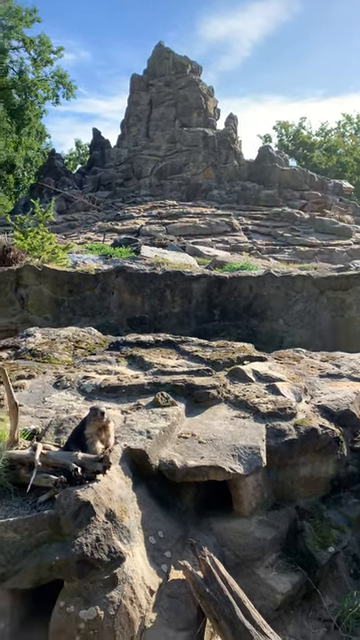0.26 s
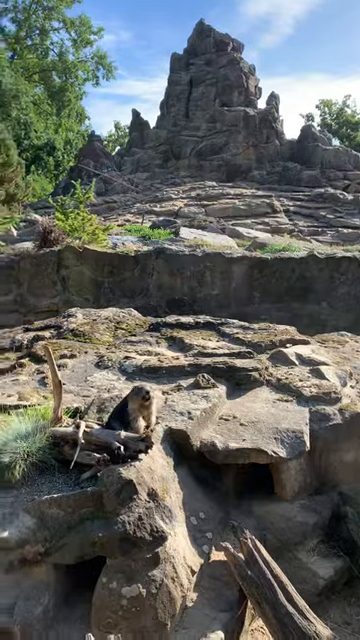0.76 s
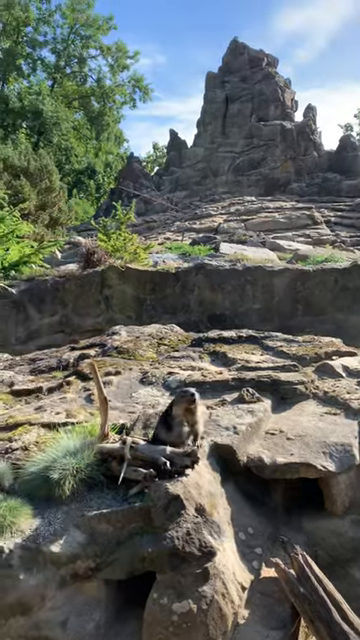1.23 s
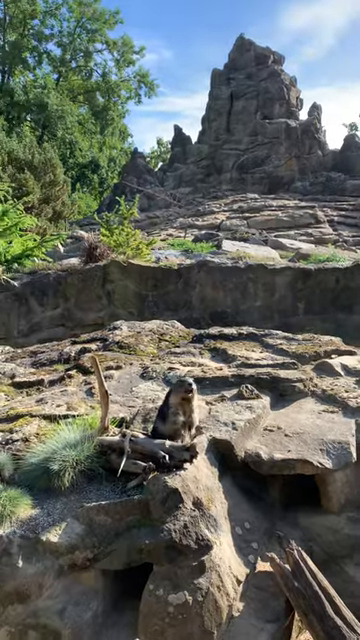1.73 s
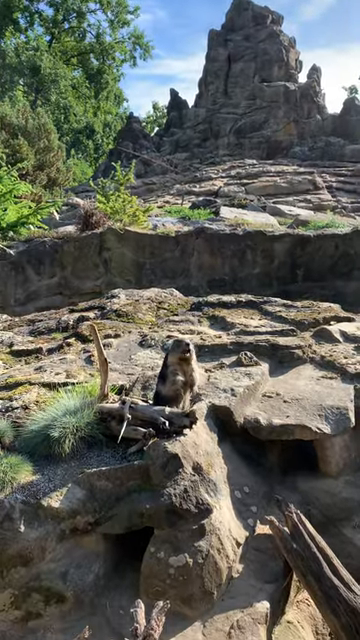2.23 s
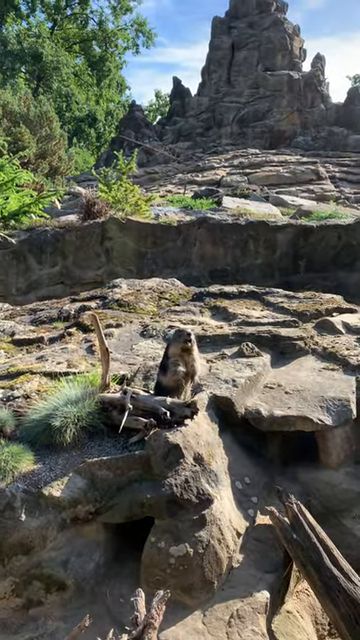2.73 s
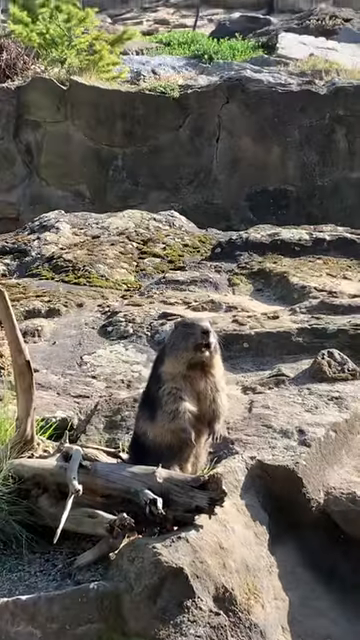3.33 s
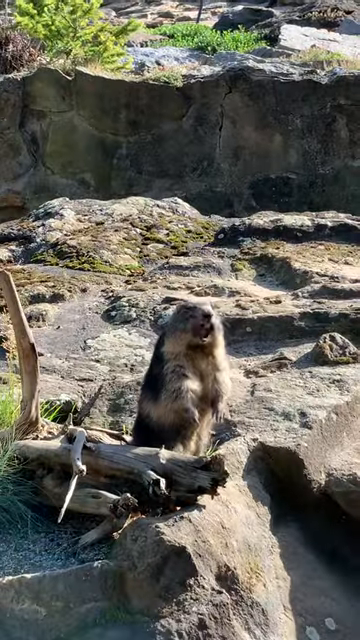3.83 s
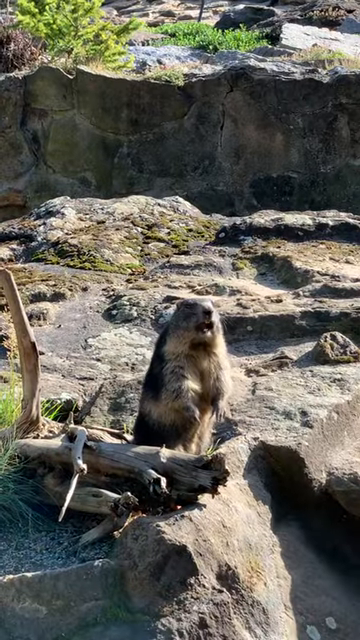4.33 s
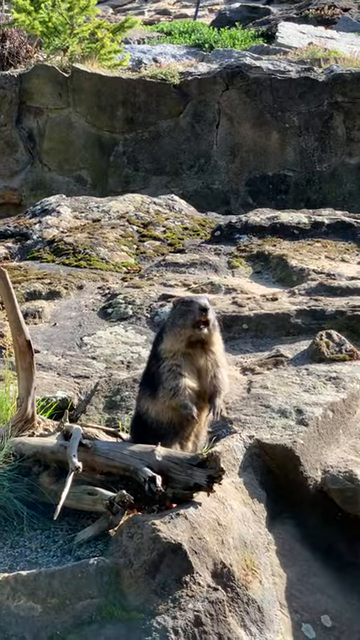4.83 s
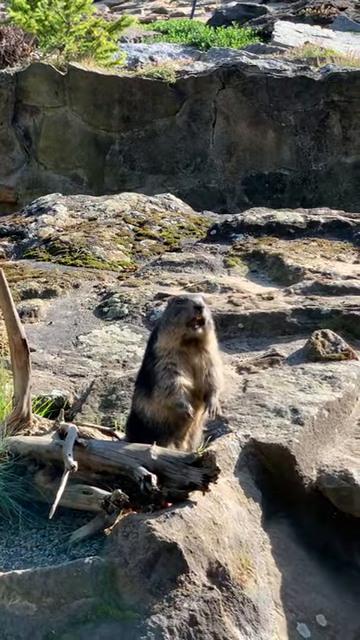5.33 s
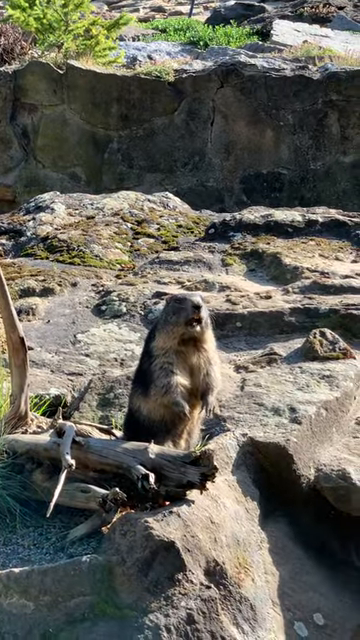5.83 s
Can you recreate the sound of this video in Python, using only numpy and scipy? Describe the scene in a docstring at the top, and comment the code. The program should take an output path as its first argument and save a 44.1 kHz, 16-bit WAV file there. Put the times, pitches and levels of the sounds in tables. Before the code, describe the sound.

Eight piercing, raspy-edged marmot whistles ring out one by one in a rocky enclosure, with tiny far-off birds and low background noise.

```python
"""A low outdoor rumble and a thin wide hiss, both filtered noise, run throughout.
Small far birds add gliding sine chirps from the start, and a few soft low calls later.
A marmot on a rock gives eight shrill whistles: harmonics and rasp sweep up, clear at the top, fall away.
Rock faces throw each whistle back as single bounces and dense scattered echoes.
Loud whistles then drive the recorder's gain down, and much of the cut creeps back slowly."""
import sys
import numpy as np
from scipy import signal
from scipy.fft import rfft, irfft, next_fast_len
from scipy.io import wavfile
from scipy.ndimage import uniform_filter1d

SR = 44100
rng = np.random.default_rng(int(sys.argv[2]) if len(sys.argv) > 2 else 0)


def unload_audio(sound):
    """Save the sound as a 16-bit wav file, at the path given as the first command line argument."""
    columns = np.transpose(np.atleast_2d(sound))
    # keep every value between -1 and 1, then stretch to whole-number steps
    steps = np.round(np.clip(columns, -1, 1) * 32767)
    wavfile.write(sys.argv[1], SR, steps.astype(np.int16))


N = 267246
TIME = np.arange(N) / SR

# Low rumble spectrum, relative: freq_hz, density_db_per_hz
RUMBLE_SPECTRUM = [(15, -50.5), (27, -18), (38, 3), (52, -1.5), (70, 3), (110, -0.5), (160, -11),
                   (300, -22), (800, -59.5)]
# Low rumble level ahead of the recorder: time_s, level_db
RUMBLE_LEVEL = [(0, -38.5), (.7, -40), (1.2, -37), (1.6, -41.5), (3.6, -41), (4.2, -38), (6.06, -38)]
# Outdoor hiss spectrum, relative: freq_hz, density_db_per_hz
AIR_SPECTRUM = [(40, -19), (100, -8), (200, -10.5), (350, -13.5), (650, -18.5), (1250, -20.5),
                (1900, -18.5), (2400, -27.5), (3900, -29.5), (5000, -36.5), (8300, -33.5), (9700, -51.5),
                (10800, -41), (12800, -41), (14500, -65)]
AIR_DB = -48

# Two-note chirps of a small far bird, before the birds' common trim: start_s, first_pitch_hz, level_db
CHIRPS = [(.08, 4360, -47), (0.448, 4400, -47), (2.09, 4380, -52), (2.69, 4100, -51.5),
          (3.174, 4430, -46.5), (3.609, 4020, -45.5), (5.684, 4910, -46.5), (6.019, 4270, -47)]
# Soft low calls from further off, before the same trim: start_s, length_s, start_pitch_hz, level_db
LOW_CALLS = [(3.091, 0.128, 1155, -46), (3.251, .043, 1160, -47), (3.94, 0.124, 730, -50),
             (5.007, 0.07, 950, -55)]
# Falls are end pitch / start pitch; the second note starts lower by SECOND_NOTE_PITCH
NOTE_S, NOTE_GAP_S, NOTE_FALL, SECOND_NOTE_PITCH = 0.076, .06, .87, .84
LOW_CALL_FALL = .92

# Whistles, ahead of the recorder:
# top_s, dwell_s, top_pitch_hz, rise_stretch, fall_stretch, level_db, overtones_db, rasp_db
WHISTLES = [(0.806, .02, 2236, 1.2, 1.42, 16.5, -2, -3), (1.229, 0.0019, 2174, 1.05, 1.1, 12.5, -3.5, -0.5),
            (1.783, 0, 2106, 1.12, 1.24, 9.5, -3.5, -0.5),
            (2.294, 0.00019, 2094, 1.03, 1.14, 7.5, -5, -0.5), (2.912, 0, 2089, 1.03, 1.12, 8, -4.5, 0.5),
            (3.830, 0.0015, 2060, 1.01, 1.2, 9, -2.5, 0.5), (4.562, 0, 2068, 1.014, 1.04, 9, -3, 1),
            (5.239, 0.00016, 2054, 1.033, 1.03, 8.5, -3.5, 2.5)]
# Whistle harmonics, relative: multiple, level_db
HARMONICS = [(1, -7.5), (2, -10), (3, -21.5), (4, -25), (5, -30.5), (6, -43.5), (7, -34.5)]
# Mouth resonances: freq_hz, gain_db
MOUTH_RESONANCE = [(650, -12), (950, -5), (1400, -2), (1750, -1.5), (2000, 0), (2130, 4.5), (2260, -7.5),
                   (2700, 1.5), (3400, 5.5), (3900, -4), (4250, 0.5), (5000, -5), (6000, -3), (6900, -12),
                   (8200, -8.5)]
# Air rushing through the throat, relative: freq_hz, density_db_per_hz
RASP_SPECTRUM = [(120, -23.5), (240, -3), (420, -22.5), (700, -18), (1050, -2), (1500, -0.5), (2200, -4.5),
                 (2700, 5), (4200, 0), (5200, -5), (5900, -10), (8200, -18), (11000, -23), (16000, -31.5)]
# Throat tightening and slackening times, before each whistle's stretch
TIGHTEN_S, TIGHTEN_SHAPE, SLACKEN_S = .036, 2.7, .056
# Slack throat before and after the top: share of top pitch, roughness 0-1
START_SHARE, END_SHARE = .28, .44
START_ROUGH, END_ROUGH = .95, .2
# Push of air, on the time axis before each whistle's stretch
LEAD_S, OPEN_S, HOLD_BEFORE_S, HOLD_AFTER_S, TRAIL_S = 0.048, .008, .0135, 0.021, .057
SWELL_DB_PER_S, SAG_DB_PER_S, RELEASE_DB_PER_S = 879, 98, 848.5   # release adds to the sag
ROUGH_LOSS_DB = 4   # loss of harmonics 3 and up at roughness 1

# Near rock faces, relative to direct sound: delay_s, level_db
ROCK_BOUNCES = [(.0047, -15), (.0125, -17), (.0215, -23)]
WALL_DELAY_S, WALL_DB = .21, -45.5   # far wall, relative to direct sound
# Interchannel phase of the direct sound and bounces: freq_hz, left_lead_rad
PORT_PHASE = [(0, -0.5), (700, -1.5), (1400, 1.5), (1850, -1.8), (2200, 2.13), (2400, -1), (3050, -1.5),
              (3800, -5.5), (4200, -5.5), (4500, -2), (5400, -2.5), (8400, 1.75), (16000, 10.5)]
# Scatter off rough stone, strongest for short waves: freq_hz, gain_db
STONE_SCATTER = [(300, -22), (1200, -18), (2000, -17.5), (3000, -14), (4200, -17), (6000, -11), (8500, -10),
                 (16000, -6)]
# Far echo colour, before the far level: freq_hz, gain_db
FAR_COLOUR = [(300, 0), (1500, 2.5), (2100, -1.5), (2600, 3), (3400, 3.5), (4150, 2), (5000, 0.5),
              (6200, -0.5), (9000, -13), (16000, -33)]

# Microphone port response: freq_hz, gain_db
PORT_RESPONSE = [(20, -5), (8600, 2), (9300, -6.5), (9800, -11), (10400, -1.5), (11000, 2), (16000, 0.5)]
CUTOFF_HZ = 15900


def from_db(db):
    """Decibels to amplitude gain."""
    return 10 ** (np.asarray(db) / 20)


def rms_one(x):
    """Scale to rms 1."""
    return x / np.sqrt(np.mean(x ** 2) + 1e-20)


def gain_at(points, hz):
    """Gain of a (freq_hz, db) curve, interpolated over log frequency."""
    f, db = np.transpose(points)
    return from_db(np.interp(np.log(np.maximum(hz, 1)), np.log(f), db))


def colour(x, points):
    """Zero-phase filter by a (freq_hz, db) curve."""
    size = next_fast_len(x.shape[-1] + 4096)
    gain = gain_at(points, np.fft.rfftfreq(size, 1 / SR))
    return irfft(rfft(x, size) * gain, size)[..., :x.shape[-1]]


def flutter(hz, size):
    """Random motion: noise low-passed at hz, rms 1."""
    noise = rng.standard_normal(max(size, SR // 4))
    lowpass = signal.butter(2, hz, fs=SR, output="sos")
    return rms_one(signal.sosfilt(lowpass, noise)[:size])


def stereo_noise(points, alike):
    """Coloured noise of rms 1; alike is the left-right correlation."""
    mid, side = colour(rng.standard_normal((2, N)), points)
    alike = np.clip(alike, -1, 1)
    return rms_one(np.sqrt(1 + alike) * mid + np.sqrt(1 - alike) * side * [[1], [-1]])


def outdoors(lump_db=1.0, lump_hz=9):
    """Lumpy low rumble, identical in both channels, under a thin wide hiss."""
    level_db = np.interp(TIME, *np.transpose(RUMBLE_LEVEL)) + lump_db * flutter(lump_hz, N)
    rumble = from_db(level_db) * stereo_noise(RUMBLE_SPECTRUM, alike=1.0)
    hiss = from_db(AIR_DB) * stereo_noise(AIR_SPECTRUM, alike=0.35)
    return rumble + hiss


def far_note(start_s, length_s, start_hz, fall, level_db, break_hz=60):
    """A short far sine glide; the trees blur and break up high notes, low ones stay smooth."""
    blur, blur_hz, full_blur_hz = .07, 140, 4500   # blur: pitch share; full scatter from full_blur_hz up
    out = np.zeros((2, N))
    at = np.flatnonzero((TIME > start_s) & (TIME < start_s + length_s))
    scattered = min(start_hz / full_blur_hz, 1) ** 2
    for channel in out:
        glide_hz = start_hz * np.linspace(1, fall, len(at))
        pitch_hz = glide_hz * (1 + blur * scattered * flutter(blur_hz, len(at)))
        breakup = 1 - scattered + scattered * flutter(break_hz, len(at))
        swell = np.hanning(len(at)) ** .5 * breakup
        channel[at] = from_db(level_db) * swell * np.sin(2 * np.pi * np.cumsum(pitch_hz) / SR)
    return out


def birds():
    """Two-note chirps, each note gliding down and the second lower, and a few soft low calls."""
    notes = []
    for start_s, pitch_hz, level_db in CHIRPS:
        for k in (0, 1):
            note_hz = pitch_hz * SECOND_NOTE_PITCH ** k
            notes.append((start_s + k * NOTE_GAP_S, NOTE_S, note_hz, NOTE_FALL, level_db))
    for start_s, length_s, pitch_hz, level_db in LOW_CALLS:
        notes.append((start_s, length_s, pitch_hz, LOW_CALL_FALL, level_db))
    # skip notes that would start past the end
    return sum(far_note(*note) for note in notes if note[0] < TIME[-2])


def throat(t):
    """Pitch share and roughness at t seconds from the top: the slacker the throat, the lower and rougher."""
    rising = t < 0
    # lopsided bell
    tightening = np.abs(t / TIGHTEN_S) ** TIGHTEN_SHAPE
    slackening = (t / SLACKEN_S) ** 2
    slack = 1 - np.exp(-np.where(rising, tightening, slackening))
    share = 1 - slack * (1 - np.where(rising, START_SHARE, END_SHARE))
    rough = slack * np.where(rising, START_ROUGH, END_ROUGH)
    return share, rough


def effort(t):
    """Level in dB of the push of air at t seconds from the top: opening, swell, sagging hold, release."""
    held_s = t + HOLD_BEFORE_S
    opening_db = 20 * np.log10(np.clip((t + LEAD_S) / OPEN_S, 1e-3, 1))
    hold_db = np.minimum(SWELL_DB_PER_S * held_s, -SAG_DB_PER_S * held_s)
    release_db = RELEASE_DB_PER_S * np.maximum(t - HOLD_AFTER_S, 0)
    return opening_db + hold_db - release_db


def marmot(rasp_db=-9, flutter_hz=380, sputter_hz=200):
    """Each whistle starts as a ragged, airy squeak and locks into a clear tone as the pitch peaks."""
    jitter, shimmer, sputter_db = .055, .75, 6   # all scaled by roughness
    waver, waver_hz, flicker_db, dulling_db_per_db = .006, 130, 1.7, .09
    out = np.zeros(N)
    air = rms_one(colour(rng.standard_normal(N), RASP_SPECTRUM))
    for top_s, dwell_s, top_hz, rise, fall, level_db, overtones_db, own_rasp_db in WHISTLES:
        begin_s, end_s = top_s - rise * LEAD_S, top_s + dwell_s + fall * TRAIL_S
        at = np.flatnonzero((TIME > begin_s) & (TIME < end_s))
        size = len(at)
        since_s = TIME[at] - top_s
        # stretched time, paused during the dwell
        progress_s = np.minimum(since_s, 0) / rise + np.maximum(since_s - dwell_s, 0) / fall
        effort_db = effort(progress_s)
        share, rough = throat(progress_s)
        pitch_hz = top_hz * share
        unsteady = waver * flutter(waver_hz, size) + jitter * rough * flutter(flutter_hz, size)
        phase = 2 * np.pi * np.cumsum(pitch_hz * (1 + unsteady)) / SR
        voice = from_db(rasp_db + own_rasp_db) * rough * air[at]
        for k, harmonic_db in HARMONICS:
            # overtones flicker, and fade first as the pressure runs out
            flicker = flicker_db * flutter(waver_hz, size)
            dulling = dulling_db_per_db * effort_db * (since_s > 0)
            bright_db = min(k - 1, 3) * (flicker + dulling)
            bright_db = bright_db - ROUGH_LOSS_DB * rough * (k > 2)
            # unsettled folds shake each harmonic apart
            torn = 1 + shimmer * rough * flutter(flutter_hz, size)
            gain = from_db(harmonic_db + overtones_db * (k > 1) + bright_db)
            voice = voice + gain * gain_at(MOUTH_RESONANCE, k * pitch_hz) * torn * np.sin(k * phase)
        # the flow starts in fits
        fits_db = sputter_db * rough * np.tanh(flutter(sputter_hz, size))
        out[at] += from_db(level_db + effort_db + fits_db) * voice
    return out


def scatter(t60_s, rise_s, points, size):
    """Spectrum of a dense stereo cloud of echoes: noise that builds up, then decays 60 dB per t60_s."""
    t = TIME[:2 * SR]
    envelope = from_db(-60 * t / t60_s) * np.minimum(t / rise_s, 1)
    cloud = envelope * rng.standard_normal((2, len(t)))
    hz = np.fft.rfftfreq(size, 1 / SR)
    return rfft(rms_one(cloud) / np.sqrt(len(t)), size) * gain_at(points, hz)


def enclosure(x, stone_t60_s=0.17, stone_rise_s=0.0091, far_db=-34, far_t60_s=1.0, far_rise_s=.08):
    """Direct sound, single bounces off near rocks and a wall, rough-stone scatter, long far-wall tail."""
    size = next_fast_len(N + 2 * SR)
    hz = np.fft.rfftfreq(size, 1 / SR)
    paths = 1
    for delay_s, level_db in ROCK_BOUNCES + [(WALL_DELAY_S, WALL_DB)]:
        paths = paths + from_db(level_db) * np.exp(-2j * np.pi * hz * delay_s)
    # half the phase lead to the left, half the lag to the right
    left_lead_rad = np.interp(hz, *np.transpose(PORT_PHASE))
    ports = np.exp(1j * left_lead_rad * np.array([[.5], [-.5]]))
    stone = scatter(stone_t60_s, stone_rise_s, STONE_SCATTER, size)
    far = from_db(far_db) * scatter(far_t60_s, far_rise_s, FAR_COLOUR, size)
    return irfft(rfft(x, size) * (paths * ports + stone + far), size)[:, :N]


def scene(birds_db=-2):
    """Outdoor noise, far birds, and the marmot among its rocks."""
    return outdoors() + from_db(birds_db) * birds() + enclosure(marmot())


def gain_control(x, threshold_db=-15.0, attack_s=0.013, release_db_per_s=60,
                 let_go_db=2.5, creep_db_per_s=1.37):
    """Loud sound cuts the gain; a lone burst is let go fast, but once overloads add up most is held."""
    step, patience_s = 44, .16   # step in samples; patience is total overload time
    dt_s = step / SR
    power = uniform_filter1d(np.mean(x ** 2, axis=0), size=220)[::step]
    excess_db = 10 * np.log10(np.maximum(power, 1e-12)) - threshold_db
    peak_db, cut_db, held_db, loud_s = 0, 0, 0, 0
    cuts_db = []
    for over_db in excess_db.tolist():
        loud_s += dt_s * (over_db > 0)
        peak_db = max(over_db, peak_db - release_db_per_s * dt_s, held_db)
        cut_db += (peak_db - cut_db) * dt_s / attack_s
        # the held part creeps away
        new_hold_db = (cut_db - let_go_db) * (loud_s > patience_s)
        held_db = max(held_db - creep_db_per_s * dt_s, new_hold_db, 0)
        cuts_db.append(cut_db)
    return x * from_db(-np.interp(TIME, TIME[::step], cuts_db))


def record(dry):
    """Gain control, rounded peaks, port notch and steep top cut."""
    rounded = 1.29 * np.tanh(gain_control(dry) / 1.422)
    ported = colour(rounded, PORT_RESPONSE)
    top_cut = signal.cheby2(16, 70, CUTOFF_HZ + 700, fs=SR, output="sos")   # 70 dB down at the stopband edge
    return signal.sosfilt(top_cut, ported)


dry = scene()
out = record(dry)
unload_audio(out)
```